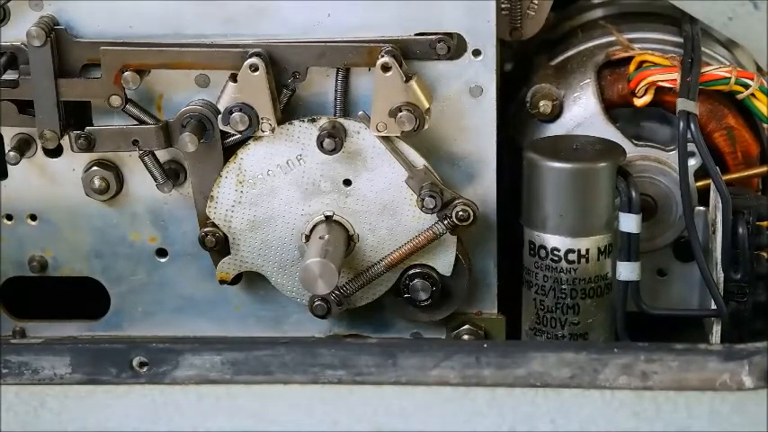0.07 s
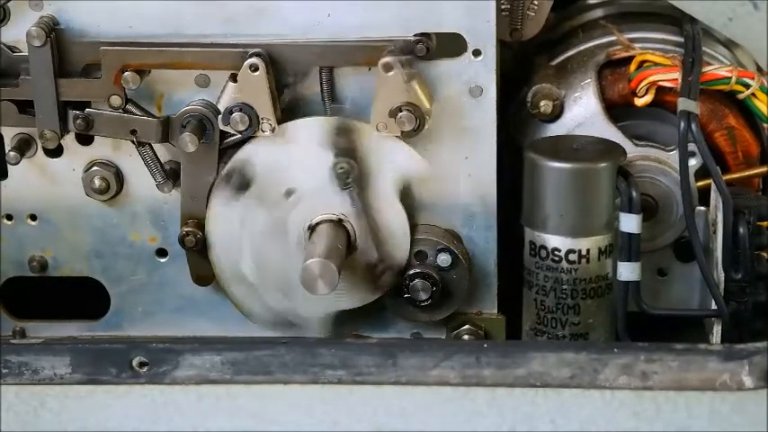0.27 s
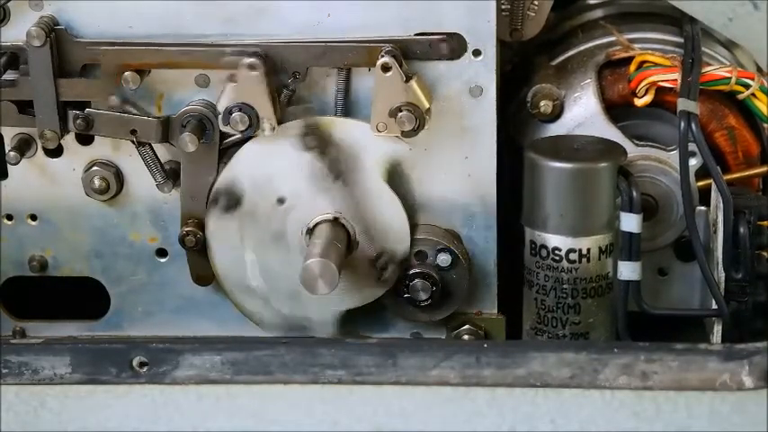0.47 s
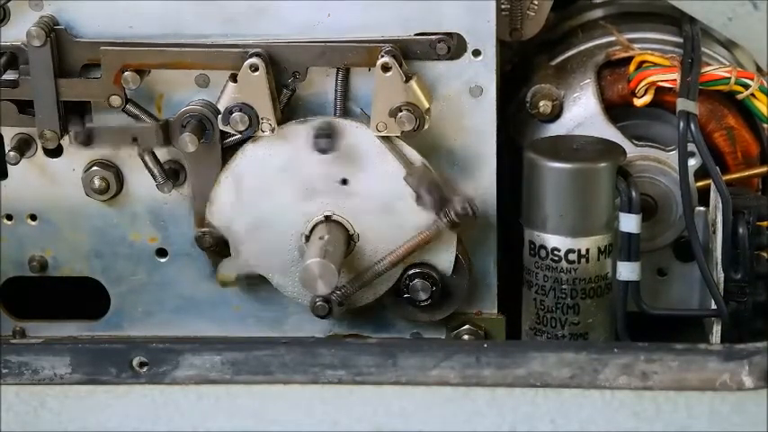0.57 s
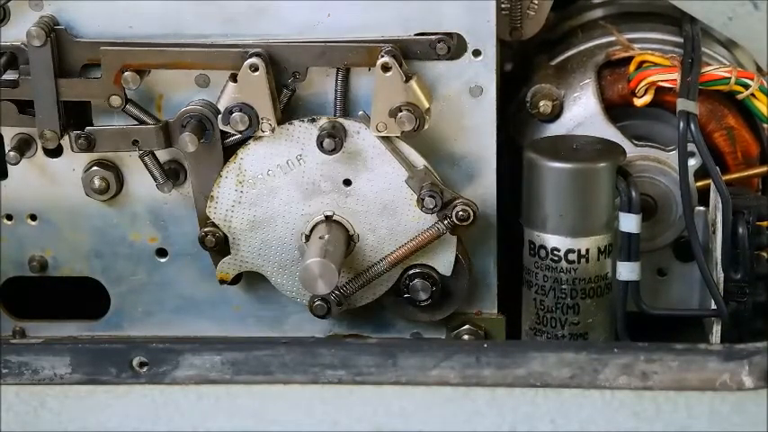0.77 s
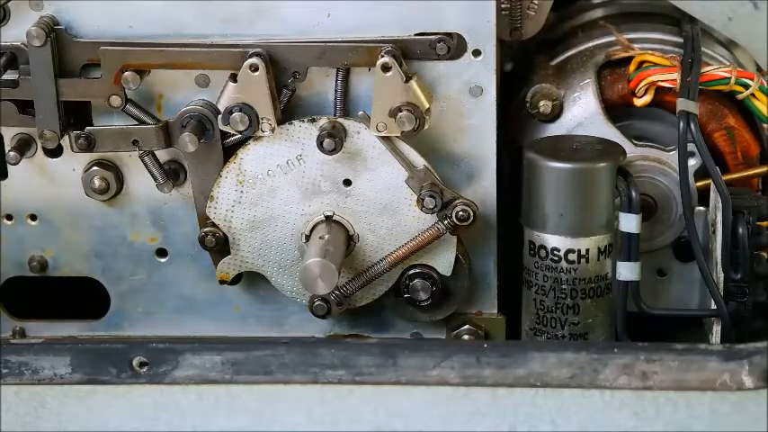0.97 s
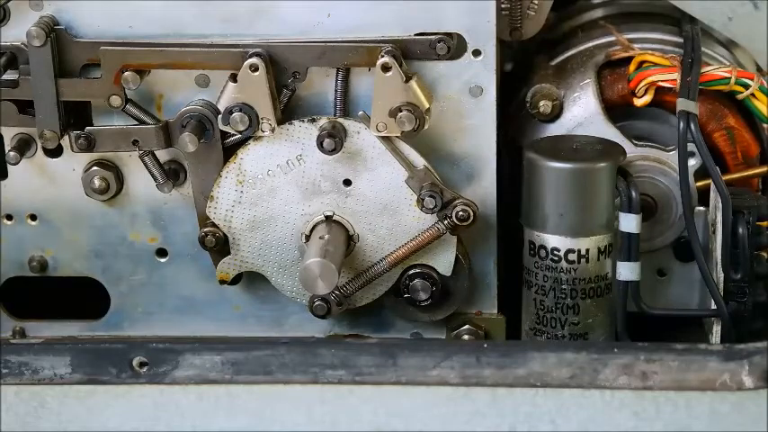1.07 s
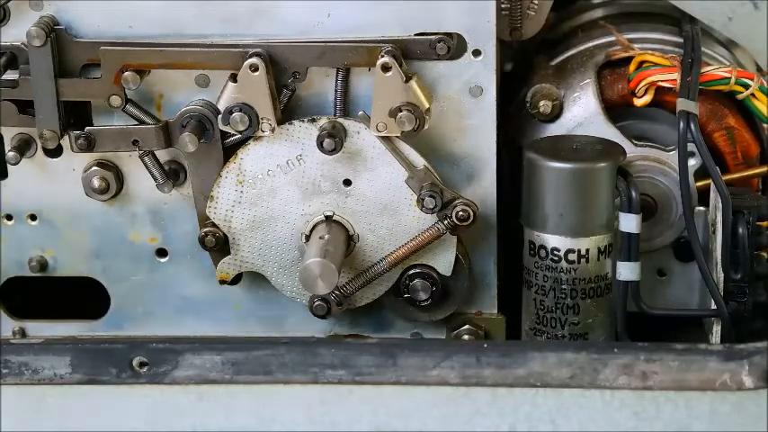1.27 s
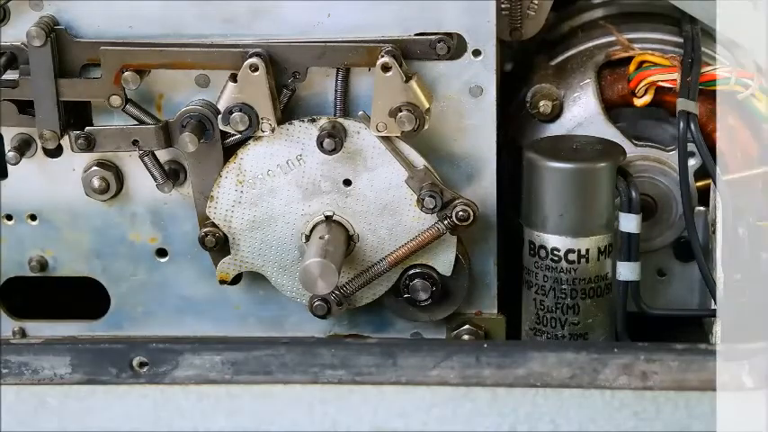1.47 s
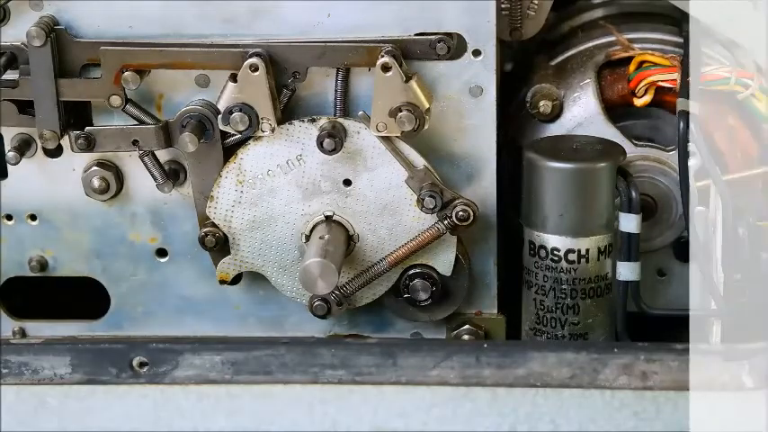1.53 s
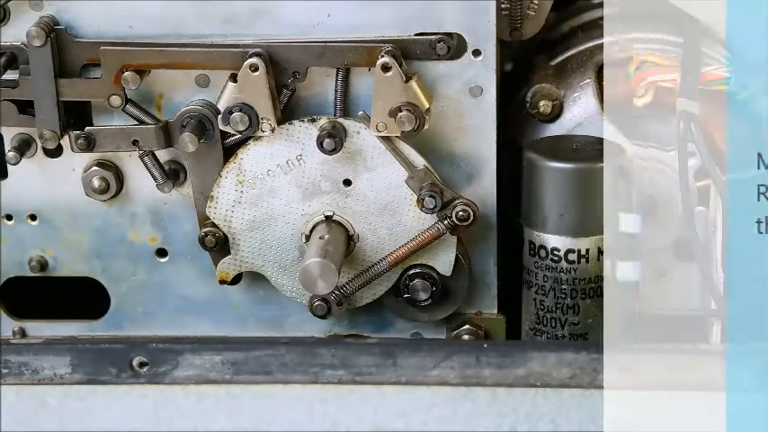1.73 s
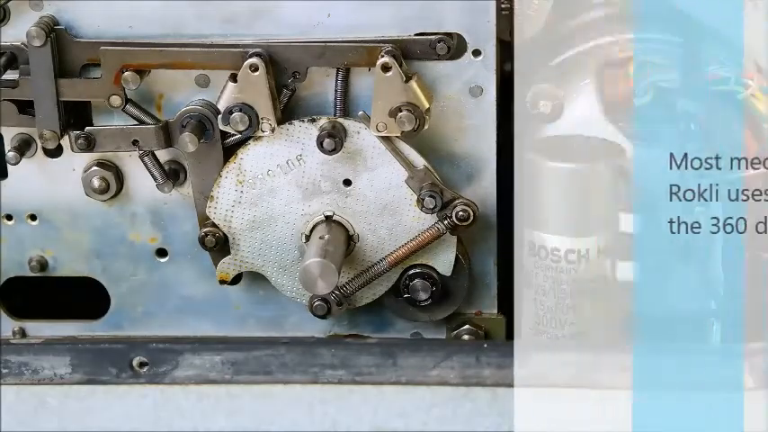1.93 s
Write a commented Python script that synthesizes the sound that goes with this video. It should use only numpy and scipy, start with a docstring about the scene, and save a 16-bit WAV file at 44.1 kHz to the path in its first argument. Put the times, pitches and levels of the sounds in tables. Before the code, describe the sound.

A motor-driven mechanical calculator cycles once, close up in a room. A springy latch click comes at 0.13 seconds, then bright steel clatter and rattle from 0.2 to 0.43, and again from 0.5 to 0.67. Metal rings on as a faint motor note falls. Tiny ticks follow near 1.1, 1.5 and 1.7 over rumble and hiss, with a thin whine from 1.76 and a soft bump at 1.9.

```python
"""In a room, close beside a motor-driven mechanical calculator, one short cycle is heard.
A latch snaps: a click of coloured noise with a springy ring. Steel levers then strike and rattle:
noise bursts and random contacts, convolved with decaying modes so that frame and springs ring on.
The motor is noise with a wavering hum and a falling note; faint ticks of resonant noise follow it.
Behind lie rumble, a drone and hiss, with a late thin whine and a soft bump."""
import sys
import numpy as np
from scipy import signal
from scipy.fft import rfft, irfft, next_fast_len
from scipy.io import wavfile
from scipy.ndimage import map_coordinates

SR = 44100
rng = np.random.default_rng(int(sys.argv[2]) if len(sys.argv) > 2 else 0)


def wrap_up_sound(samples):
    """Save the sound to the file named by the first command line argument, as 16-bit audio."""
    columns = np.atleast_2d(samples).T
    # keep every value between -1 and 1, then stretch to whole-number steps
    tamed = np.clip(columns, -1, 1)
    steps = np.round(tamed * 32767).astype(np.int16)
    wavfile.write(sys.argv[1], SR, steps)


N = 88200  # samples

# All levels are relative: spectra are scaled to rms 1, and layers are weighted again when mixed.
# Lever blows: (time [s], clack level [dB], bright edge level [dB], pitch of the struck part [Hz])
BLOWS = [(0.197, -22.5, -13.5, 2992), (.209, -18.5, -8.5, 10720), (0.2174, -26, -13, 11960),
         (.26, -24.5, -19, 10460), (.27, -21, -14, 8900), (0.2744, -18.5, -8.5, 6610),
         (0.2785, -8.5, -6, 6290), (0.284, -16, -13, 4833), (0.305, -21.5, -15, 7300),
         (0.3138, -17, -4.5, 5716), (0.3187, -16, -11.5, 4830), (0.328, -19.5, -5.5, 13320),
         (0.3436, -16, -7.5, 6960), (0.379, -15, -25.5, 3724), (0.405, -15, -4, 7560),
         (0.414, -10, -19.5, 3750), (0.5, -15.5, -14.5, 2530), (0.518, -12.5, -12.5, 7500),
         (0.526, -11, -3.5, 4730), (0.5298, -18.5, -15.5, 3910), (0.5436, -8.5, -6, 3190),
         (.551, -17, -15.5, 7480), (.5812, -21, -17.5, 3320), (0.6137, -7.5, -14, 4013),
         (0.6298, -20, -7.5, 12190), (.638, -18, -12, 6800), (0.6546, -17, -9, 6000),
         (.6578, -16, -10.5, 11380), (0.6653, -19.5, -17.5, 3000)]
# Spectra of the noise a blow excites in frame, levers and bright edges: (frequency [Hz], level [dB])
FRAME_SPECTRUM = [(300, -22), (430, -11.5), (590, -15.5), (690, 3.5), (830, 1), (950, -11), (1130, 0),
                  (1750, -8.5), (2200, -10.5), (3000, -13.5), (5000, -57)]
LEVER_SPECTRUM = [(900, -37), (2000, -7.5), (2600, -8), (3100, 1.5), (3500, -6.5), (4050, .5), (5200, -2.5),
                  (7200, -6), (9500, -14.5), (16000, -32)]
EDGE_SPECTRUM = [(2500, -33), (5500, -5), (7400, -1.5), (9000, -1.5), (10700, 0), (12300, 3), (14000, 1),
                 (15300, 1), (16000, -9)]
# Response of frame, lever and edge, one row each: (attack [s], hold [s], T60 [s],
# blow level [dB], rattle level [dB], ring level [dB], side level [dB])
PARTS = [(0.00076, .0024, 0.061, -15.5, -14, -6, -10), (0.0011, 0.00068, 0.023, -3, -2, -4, -6),
         (0.00023, 0.002, 0.018, -2, 1, -4, -1)]
# Gear and pawl rattle, then loose parts shivering: (time [s], level [dB])
RATTLE = [(.195, -92.5), (.2, -21.5), (.24, -27), (.266, -31), (.278, -20), (.33, -20), (.36, -23),
          (.42, -20), (.445, -35), (.495, -35), (.52, -18.5), (.54, -19.5), (.57, -30), (.61, -25.5),
          (.645, -22.5), (.675, -24), (.7, -39.5), (1.3, -91.5)]
# Decay of the dense ringing: (frequency [Hz], T60 [s])
RING_T60 = [(150, .7), (800, 0.82), (4000, 0.62), (8000, 0.54), (15000, 0.35)]
# Stereo width of the dense ringing: (frequency [Hz], side level [dB])
RING_SIDE = [(150, -5), (700, -9), (1200, -7.5), (4000, 2), (12000, 0)]
# Lasting modes of frame and springs: (frequency [Hz], level [dB], T60 [s])
STEEL_MODES = [(742.3, -14, 0.6), (844, -16, 0.32), (829, -12.5, 0.25), (1139, -12, 1), (1185, -12.5, 0.68),
               (1396, -6.5, 0.74), (1572, -6.5, 0.43), (3160, -16, 0.25), (4090, -17, 0.27),
               (5760, -21, .36), (7200, -18, 0.4), (11968, -17, .4), (13200, -20.5, .4)]
# Knocks on frame and base: (time [s], level [dB], pitch [Hz])
KNOCKS = [(0.261, -27, 807), (0.273, -36.5, 70), (0.28, -29, 1090), (.283, -21, 697), (0.305, -28.5, 1100),
          (.338, -40, 245), (.375, -30, 727), (0.404, -33.5, 250), (0.404, -31.5, 735), (0.503, -24.5, 756),
          (0.517, -39, 130), (.526, -16.5, 765), (.541, -25, 670), (.581, -25.5, 1164), (0.599, -30, 700),
          (0.627, -28, 890), (.664, -26.5, 829)]
# The latch and its bounce: (time [s], level [dB])
TRIPS = [(0.1255, -25), (0.133, -36)]
# Spectrum of the latch click: (frequency [Hz], level [dB])
LATCH_SPECTRUM = [(200, -10.5), (900, -14), (2000, -21.5), (3400, -5.5), (4000, 4), (4700, -6.5),
                  (6200, -1), (7600, 5), (8800, -4.5), (11500, -5.5), (13700, -5), (16000, -11)]
# Parts settling: (time [s], level [dB], centre [Hz], width [octaves], T60 [s])
TICKS = [(1.077, -49, 2400, 0.55, 0.036), (1.094, -51.5, 12000, 0.18, 0.0078),
         (1.1571, -38.5, 10680, 1.25, 0.0066), (1.175, -51, 904, 1.04, .06),
         (1.528, -63.5, 3970, 0.64, 0.088), (1.7095, -53.5, 4064, 0.052, 0.018),
         (1.896, -47.5, 703, 0.51, 0.024)]
# Motor rumble: (time [s], level [dB])
MOTOR = [(.19, -87.5), (.21, -54.5), (.255, -54), (.275, -38.5), (.32, -37.5), (.37, -52.5), (.48, -56),
         (.61, -54), (.66, -60.5), (.82, -56.5), (1.05, -65.5), (1.4, -77)]
# Spectrum of the motor rumble: (frequency [Hz], level [dB])
MOTOR_SPECTRUM = [(25, -9.5), (55, -2), (120, -4), (190, -11), (480, -11), (2000, -54.5)]
# Motor hum, sagging as the disc is stopped: (time [s], level [dB])
HUM = [(.27, -82), (.31, -51.5), (.36, -51.5), (.54, -58), (.6, -73.5), (.66, -54.5), (.83, -59),
       (.92, -66), (1.4, -91)]
# Background: (time [s], low rumble level [dB], hiss level [dB])
FLOOR = [(0, -59.5, -57), (.68, -66.5, -82), (.95, -50.5, -55.5), (1.2, -55.5, -58), (1.29, -54.5, -55),
         (1.36, -61.5, -59.5), (1.55, -65, -63.5), (1.68, -71.5, -70), (1.73, -69.5, -65),
         (1.77, -59.5, -64), (1.84, -59, -58.5), (2, -60, -58)]
# Spectra of background rumble, hiss and bump: (frequency [Hz], level [dB])
RUMBLE_SPECTRUM = [(25, -4), (55, 1), (150, 1), (280, 0), (480, -0.5), (600, -5.5), (1300, -11.5),
                   (2500, -21), (6000, -44)]
HISS_SPECTRUM = [(300, -7), (1500, 1), (4000, 2.5), (9000, -1), (15500, -0.5)]
BUMP_SPECTRUM = [(60, -19), (150, -0.5), (330, 2), (520, -10.5), (750, -7), (2000, -35), (12000, -47.5)]

RATTLE_PER_S, RATTLE_SCATTER_DB, RATTLE_T60 = 600, 1.5, 0.0054  # contact rate at the strongest rattle
RATTLE_THINNING = 0.4  # exponent: contacts grow sparser as the rattle weakens
PART_DB, PART_OCTAVES, PART_T60, PART_RING_DB = -2.5, 0.15, 0.0075, -7.5
FRAME_CUT_HZ = 440  # the small plates radiate little below this
KNOCK_HOLD_S, KNOCK_T60, KNOCK_RING_DB, KNOCK_NOTE_DB = 0.0018, 0.077, -10.5, -7.5
KNOCK_WIDTH_HZ = 230  # sets the cluster width in octaves, smaller at higher pitch
LATCH_T60, LATCH_RING_DB, LATCH_SPRING_T60 = 0.0021, 4, 0.3
SPRING_DB, SPRING_OCTAVES = -47, 0.05
TICK_RING_DB = -3.5
HUM_HZ, HUM_WANDER = 140.5, 0.04  # wander as a fraction of the pitch
COAST_S, COAST_HZ, COAST_END_HZ = 0.56, 350, 268  # falling note of the slowing motor
COAST_SAG_S, COAST_DB, COAST_T60 = 0.144, -62, 0.68
DRONE_HZ, DRONE_DB = 272.4, -11  # level relative to the rumble
BUMP_S, BUMP_DB, BUMP_HOLD_S, BUMP_T60 = 1.896, -43.5, 0.032, 0.15
WHINE_HZ, WHINE_DB, WHINE_START_S, WHINE_RISE_S = 1228, -65.5, 1.76, 0.072
CLIP_TOP = 0.96  # ceiling, full scale = 1
TOP_HZ = 15850  # band limit


def mechanism():
    """Impact excitation: blows and rattle drive frame, levers and bright edges, which then ring on."""
    out = np.zeros((2, N))
    teeth = rattle()
    spectra = (FRAME_SPECTRUM, LEVER_SPECTRUM, EDGE_SPECTRUM)
    for k, (spectrum, part) in enumerate(zip(spectra, PARTS)):
        attack, hold, t60, blow_db, rattle_db, ring_db, side_db = part
        power = (amp(rattle_db) * teeth) ** 2
        for start, clack_db, edge_db, _ in BLOWS:
            # the frame takes the weaker level: only full blows shake it
            level_db = (min(clack_db, edge_db), clack_db, edge_db)[k]
            power = power + (amp(level_db + blow_db) * burst(start, attack, hold, t60)) ** 2
        direct = np.sqrt(power) * noise(spectrum, side_db)
        out += direct + amp(ring_db) * ring(direct[0]) + steel(direct[1])
    return out


def rattle():
    """Random impact process: the summed power of tiny decaying tooth and pawl contacts, as an envelope."""
    chance, size = rng.random(N), rng.standard_normal(N)
    level, = gains(RATTLE)
    density = (level / level.max()) ** RATTLE_THINNING
    happens = chance < density * RATTLE_PER_S / SR
    contacts = happens * unit(amp(RATTLE_SCATTER_DB * size)) * level
    decay = amp(-60 * clock() / RATTLE_T60) ** 2
    # fewer contacts are each made stronger, so the mean power follows the level
    contact_power = contacts ** 2 / density * SR / RATTLE_PER_S
    power = signal.fftconvolve(contact_power, decay / decay.sum())[:N]
    return np.sqrt(np.abs(power))


def ring(x):
    """Dense modal decay: countless plate and spring modes, blended with the room, fade by frequency."""
    hz, t, z = signal.stft(rng.standard_normal((2, SR)), SR, nperseg=256)
    fade = amp(-60 * t / along(RING_T60, hz)[:, None])
    z = stereo(z, along(RING_SIDE, hz)[:, None]) * fade
    tail = signal.istft(z, SR, nperseg=256)[1]
    return signal.fftconvolve(x[None], tail / np.linalg.norm(tail[0]), axes=1)[:, :N]


def steel(x):
    """Modal superposition: damped sines stand out of the ringing, their phases unlike on each side."""
    t = np.arange(SR) / SR
    modes = np.zeros((2, SR))
    for hz, db, t60 in STEEL_MODES:
        side_phase = rng.normal(0, np.sqrt(hz / TOP_HZ), (2, 1))
        phase = rng.uniform(0, 2 * np.pi) + side_phase
        modes += amp(db - 60 * t / t60) / np.sqrt(t60) * np.sin(2 * np.pi * hz * t + phase)
    return amp(-49.5) * signal.fftconvolve(x[None], modes, axes=1)[:, :N]


def struck_parts():
    """Damped local resonance: every lever adds its own brief note to its blow."""
    notes = np.zeros((2, N))
    for start, clack_db, _, hz in BLOWS:
        envelope = amp(clack_db + PART_DB) * burst(start, 0.00028, 0.0018, PART_T60)
        notes += envelope * band(hz, PART_OCTAVES, side_db=-8.5)
    return notes + amp(PART_RING_DB) * ring(notes[0])


def radiated(x):
    """Radiation efficiency: small plates give off little bass, here a fourth-order high-pass."""
    sos = signal.butter(N=4, Wn=FRAME_CUT_HZ / (SR / 2), btype="high", output="sos")
    return signal.sosfilt(sos, x)


def knocks():
    """Modal response at the struck point: heavy arms wake a rough noise cluster around a sine note."""
    out = np.zeros((2, N))
    for start, db, hz in KNOCKS:
        octaves = KNOCK_WIDTH_HZ / (hz + KNOCK_WIDTH_HZ)
        cluster = band(hz, octaves, side_db=-10)
        note = amp(KNOCK_NOTE_DB) * np.sin(2 * np.pi * hz * (clock() - start))
        out += amp(db) * burst(start, 0.0027, KNOCK_HOLD_S, KNOCK_T60) * (cluster + note)
    return out + amp(KNOCK_RING_DB) * radiated(ring(out[0]))


def latch():
    """Impact and spring resonance: the latch snaps, bounces once and leaves its spring ringing."""
    snaps = sum(amp(db) * burst(start, 0.0003, 0.0016, LATCH_T60) for start, db in TRIPS)
    click = snaps * noise(LATCH_SPECTRUM, side_db=-1)
    two_notes = sum(band(hz, SPRING_OCTAVES, side_db=-3.5) for hz in (4130, 7650))
    spring = amp(SPRING_DB) * two_notes
    fade = burst(TRIPS[0][0], 0.001, 0.005, LATCH_SPRING_T60)
    return click + (amp(LATCH_RING_DB) * ring(click[0]) + spring) * fade


def ticks():
    """Small impacts: parts dropping into place sound as short bursts of resonant noise."""
    out = np.zeros((2, N))
    for start, db, centre, width, t60 in TICKS:
        out += amp(db) * burst(start, 0.00024, 0.0007, t60) * band(centre, width, side_db=-10)
    return out + amp(TICK_RING_DB) * ring(out[0])


def motor():
    """Rotational sound: broadband rumble, a wavering hum and a note that falls as the motor coasts down."""
    rumble = gains(MOTOR)[0] * noise(MOTOR_SPECTRUM, side_db=-5)
    hum = gains(HUM)[0] * tone(HUM_HZ, HUM_WANDER, flutter_db=3, rate=22)
    sag = np.exp(-np.maximum(clock() - COAST_S, 0) / COAST_SAG_S)
    hz = COAST_END_HZ + (COAST_HZ - COAST_END_HZ) * sag
    envelope = amp(COAST_DB) * burst(COAST_S, 0.01, COAST_SAG_S, COAST_T60)
    coast = envelope * tone(hz, HUM_WANDER / 2, flutter_db=8)
    return rumble + hum + coast


def background():
    """Superposed ambient noise and lines: rumble with a drone, hiss, a late wavering whine, a soft bump."""
    low, high = gains(FLOOR)
    drone = amp(DRONE_DB) * tone(DRONE_HZ, wander=0.02, flutter_db=2.5)
    rumble = low * (noise(RUMBLE_SPECTRUM, side_db=-6) + drone)
    hiss = high * noise(HISS_SPECTRUM, side_db=0.5)
    bump_envelope = amp(BUMP_DB) * burst(BUMP_S, 0.0016, BUMP_HOLD_S, BUMP_T60)
    bump = bump_envelope * noise(BUMP_SPECTRUM, side_db=-19.5)
    rise = np.clip((clock() - WHINE_START_S) / WHINE_RISE_S, 0, 1)
    whine = amp(WHINE_DB) * rise * tone(WHINE_HZ, wander=0.0157, flutter_db=4.5, rate=45)
    return rumble + hiss + bump + whine


def amp(db):
    """Level law: decibels to amplitude gain."""
    return 10 ** (np.asarray(db) / 20)


def unit(x):
    """Power normalisation: scale to rms 1."""
    return x / np.sqrt(np.mean(x ** 2) + 1e-20)


def along(points, hz):
    """Logarithmic frequency scale: interpolate (frequency [Hz], value) points on it."""
    f, v = np.transpose(points)
    return np.interp(np.log(hz + 1), np.log(f + 1), v)


def clock():
    """Uniform sampling: the time of every sample in seconds."""
    return np.arange(N) / SR


def gains(rows):
    """Level interpolation: one gain curve for each dB column after the time."""
    s, *columns = np.transpose(rows)
    return [amp(np.interp(clock(), s, column)) for column in columns]


def wobble(rate):
    """Band-limited fluctuation: a smooth random curve, rate knots a second."""
    knots = rng.standard_normal(int(N * rate / SR) + 4)
    return map_coordinates(knots, [clock() * rate])


def filtered(x, response):
    """Linear filtering: multiply the spectrum by a response of frequency."""
    m = next_fast_len(N + SR // 2)
    hz = np.fft.rfftfreq(m, 1 / SR)
    return irfft(rfft(x, m) * response(hz), m)[..., :N]


def stereo(pair, side_db):
    """Mid-side superposition: left and right from two unrelated signals, at equal power."""
    side = amp(side_db)
    left, right = pair[0] + side * pair[1], pair[0] - side * pair[1]
    return np.array([left, right]) / np.sqrt(1 + side ** 2)


def noise(spectrum, side_db):
    """Spectral shaping: stereo noise of rms 1 with the given spectrum."""
    pair = filtered(rng.standard_normal((2, N)), lambda hz: amp(along(spectrum, hz)))
    return unit(stereo(pair, side_db))


def band(centre, width, side_db):
    """Single resonance: stereo noise of rms 1 around centre [Hz], width in octaves."""
    def resonance(hz):
        return 1 / (1 + (np.log2((hz + 1) / centre) / width) ** 2)
    return unit(stereo(filtered(rng.standard_normal((2, N)), resonance), side_db))


def burst(start, attack, hold, t60):
    """Damped response: linear attack, hold and exponential release."""
    t = clock() - start
    return np.clip(t / attack, 0, 1) * amp(-60 * np.maximum(t - attack - hold, 0) / t60)


def tone(hz, wander, flutter_db, rate=10):
    """Frequency and amplitude modulation: an unsteady line of rms 1, rate random knots a second."""
    phase = 2 * np.pi * np.cumsum(hz * (1 + wander * wobble(rate))) / SR
    return unit(np.sin(phase) * amp(flutter_db * wobble(rate)))


def scene():
    """Linear superposition: machine and background add, the sum balanced slightly to the left."""
    balance_db = 0.31
    machine = radiated(mechanism() + struck_parts()) + knocks() + latch() + ticks() + motor()
    return (machine + background()) * amp([[balance_db], [-balance_db]])


def record(dry):
    """Saturation and band limiting: the recorder rounds the highest peaks and cuts the top treble."""
    clipped = dry / (1 + np.abs(dry / CLIP_TOP) ** 6) ** (1 / 6)
    # the cut is a linear slope 100 Hz wide
    return filtered(clipped, lambda hz: np.clip((TOP_HZ - hz) / 100 + 0.5, 0, 1))


dry = scene()
out = record(dry)
wrap_up_sound(out)
```